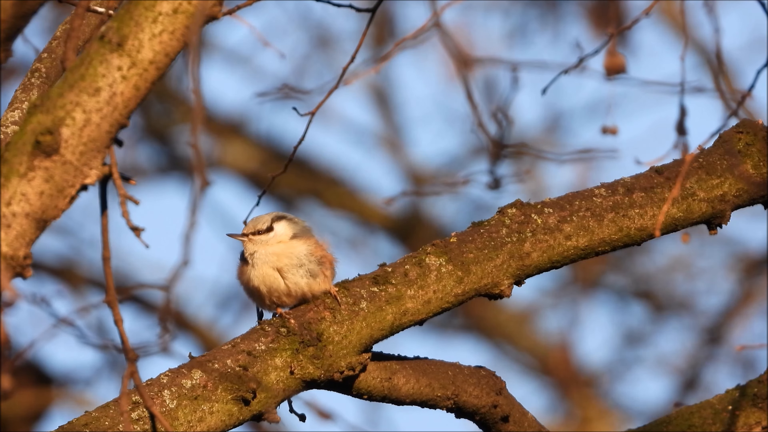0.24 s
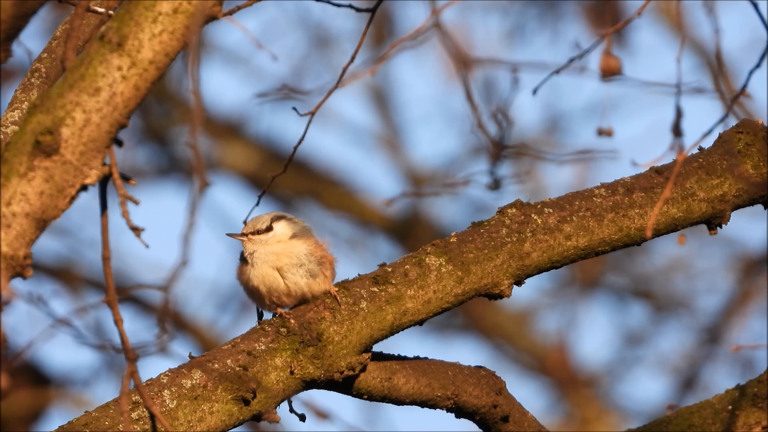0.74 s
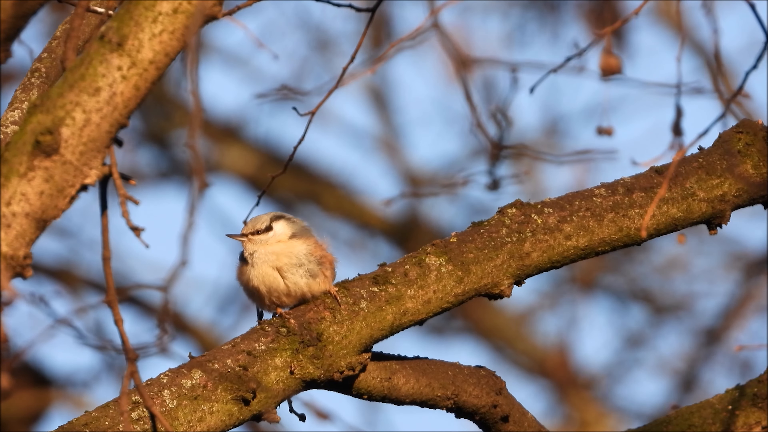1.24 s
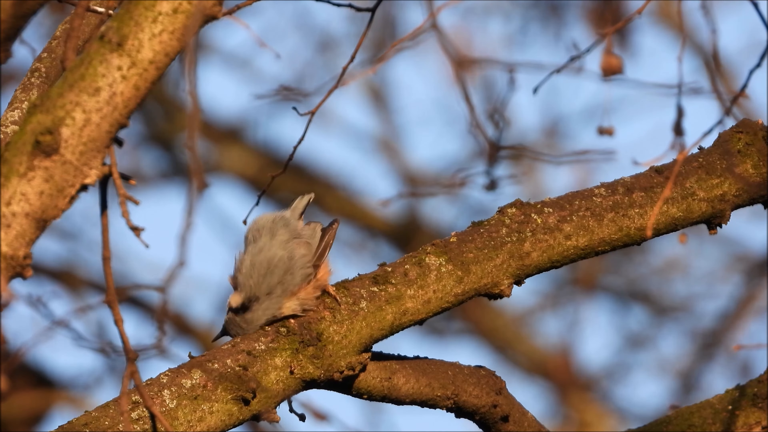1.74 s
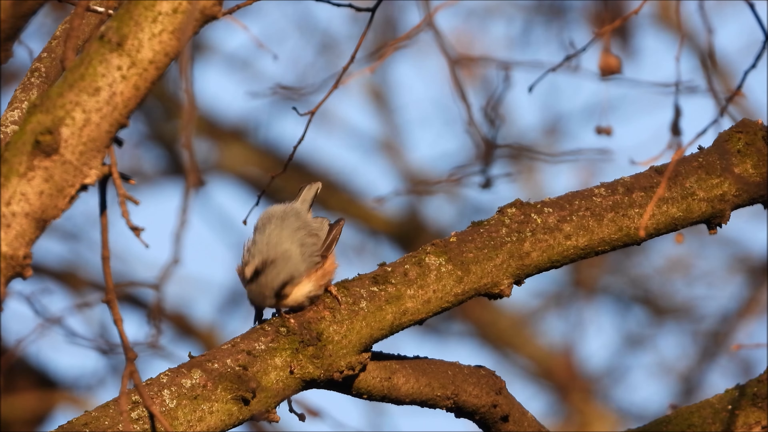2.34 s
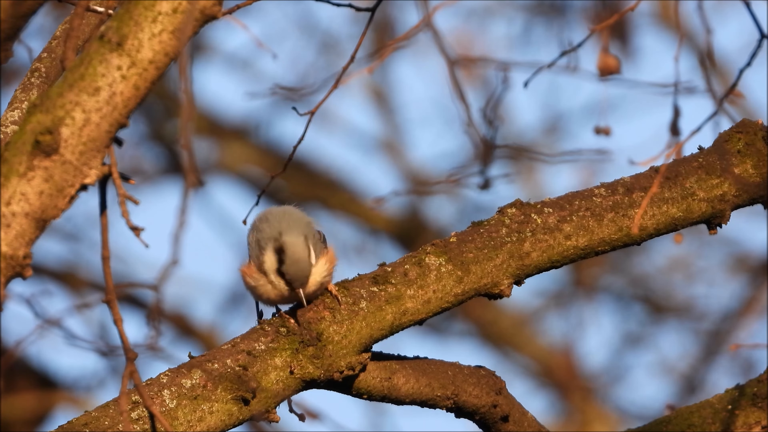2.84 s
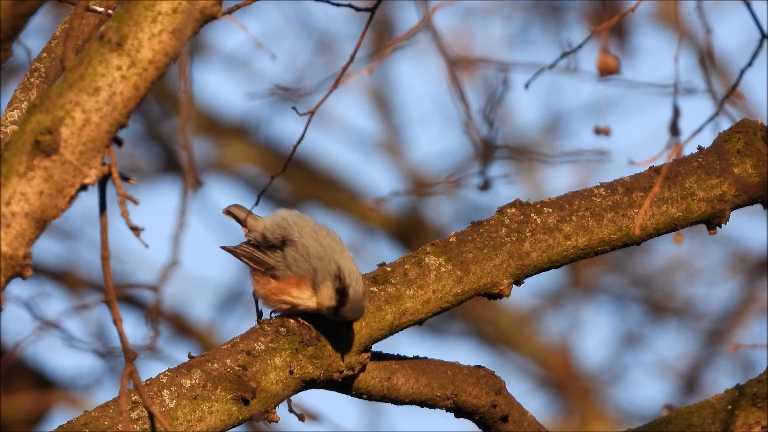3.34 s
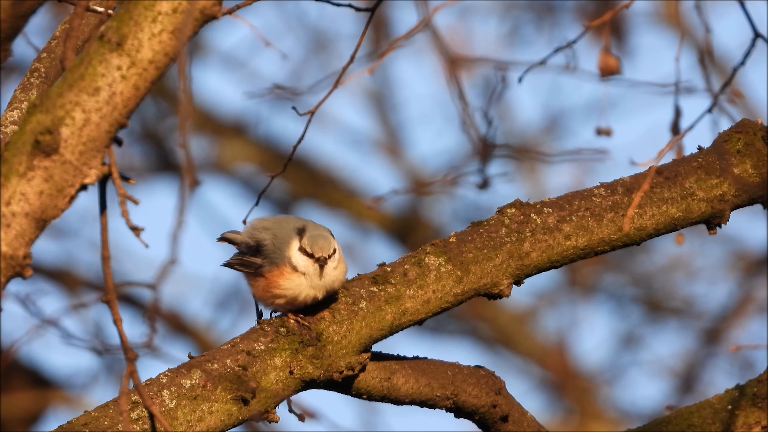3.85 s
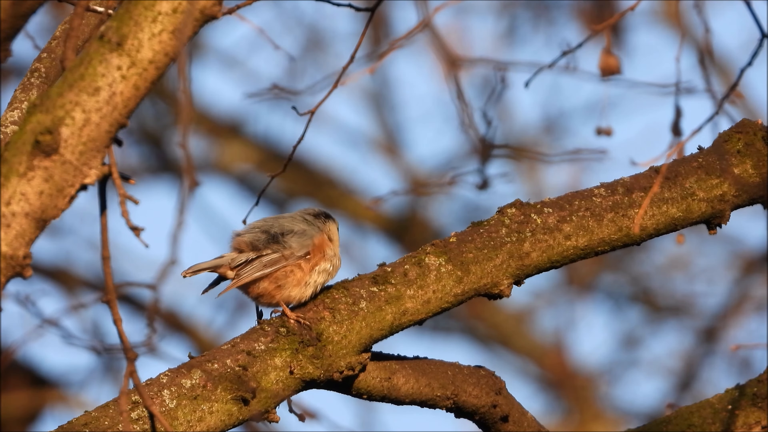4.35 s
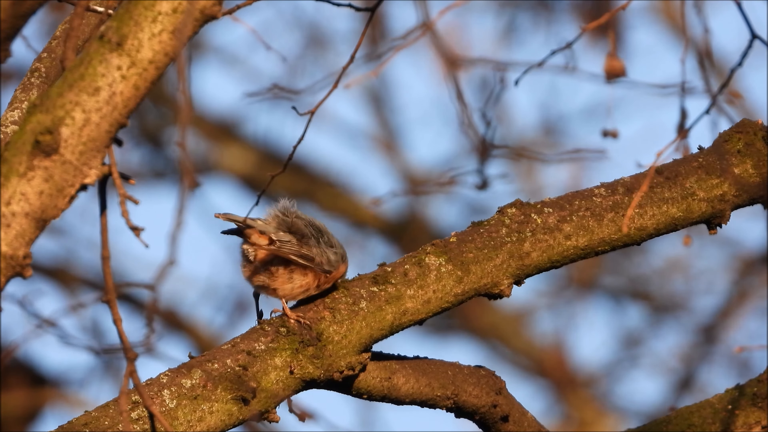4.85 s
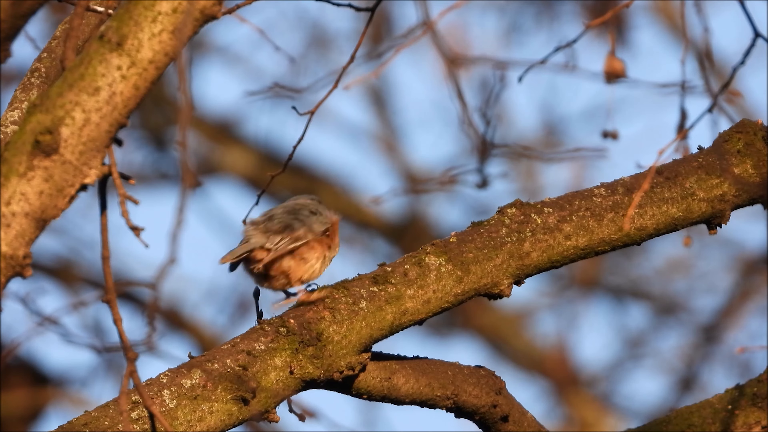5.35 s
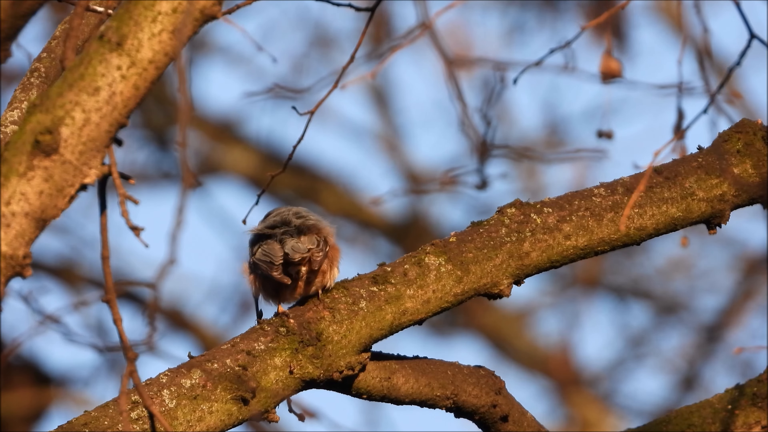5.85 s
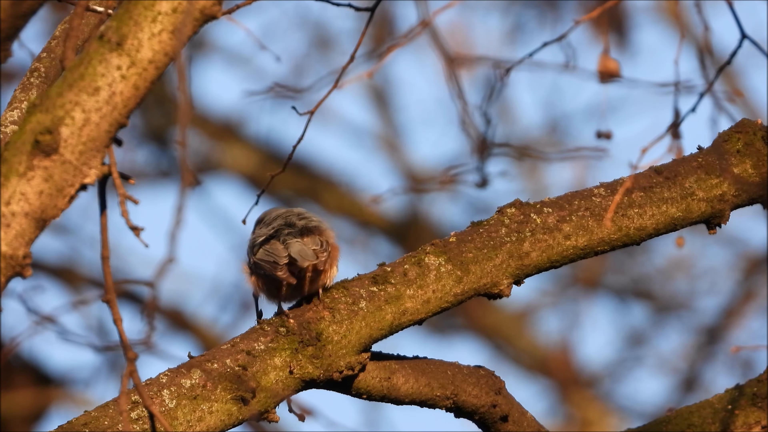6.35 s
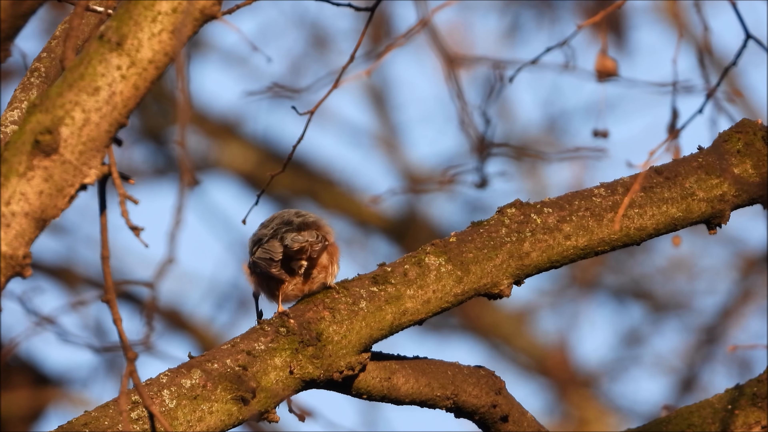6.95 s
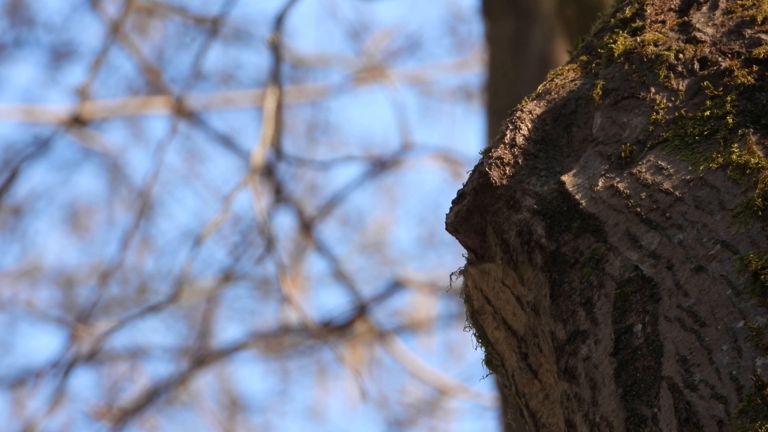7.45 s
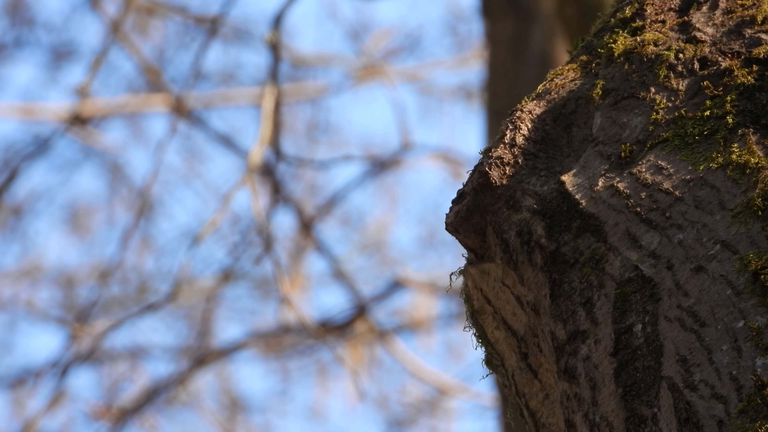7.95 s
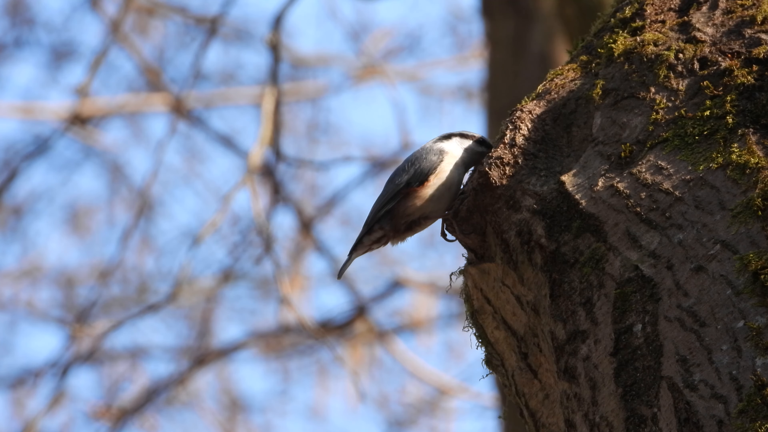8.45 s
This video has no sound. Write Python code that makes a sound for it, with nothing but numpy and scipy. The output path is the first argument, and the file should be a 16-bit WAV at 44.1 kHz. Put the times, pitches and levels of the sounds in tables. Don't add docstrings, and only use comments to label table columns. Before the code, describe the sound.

A quiet winter wood with soft distant traffic hum, very low wind thuds on the microphone, strongest at the start, and a faint aircraft drone fullest near 5.7 s. From 0.3 to 5.3 s a tit repeats one phrase every half second: faint chip, clear level whistle around 4.2 kHz, then a tenth-second buzz dropping to 4.5 kHz with a rapid flutter. A nearer thrush flutes at 1.3 to 2.8 kHz with quick flicks, busy from 0.7 to 2.3 s, again 2.7 to 3.6 s, and 5.6 to 7.1 s. A twig snaps drily at 3.8 s. Thin high twitters appear near 1.9 and 6.2 s. Far thrushes whistle and warble throughout, most clearly from 6 to 8.3 s. The tit restarts, softer and slightly higher, at about 8.5 s. Everything rings in a grainy woodland echo lasting about a second.

```python
import sys
import numpy as np
from scipy import signal
from scipy.fft import rfft, irfft
from scipy.io import wavfile
from scipy.ndimage import uniform_filter1d

SR = 44100
rng = np.random.default_rng(int(sys.argv[2]) if len(sys.argv) > 2 else 0)


def to_linear_factor(level_db):
    exponent = np.asarray(level_db, float) / 20
    return 10 ** exponent


def to_wav(sig):
    pcm = np.clip(np.atleast_2d(sig), -1, 1) * 32767
    pcm = np.round(pcm).astype(np.int16)
    wavfile.write(sys.argv[1], SR, pcm.T)


N = 384111
LEAD = SR // 2

# f/Hz, density/dB
HUM_SPECTRUM = [(30, -11.5), (52, -9), (80, -28.5), (110, -25), (150, -35), (350, -30.5), (730, -35),
                (1250, -46), (2000, -50), (3300, -51), (6000, -58.5), (11700, -60.5), (12200, -81)]
# middle t/s, half length/s, level/dB
GUSTS = [(-.01, 0.034, -18), (0.231, 0.053, -27), (0.537, 0.11, -36.5), (1.287, 0.17, -41.5),
         (1.74, 0.054, -44), (2.3, 0.17, -37.5), (3.317, 0.4, -43), (4.18, 0.11, -37.5), (4.627, 0.13, -43),
         (5.657, 0.18, -27), (6.34, 0.1, -45), (7.036, 0.24, -39), (8.238, 0.32, -44)]

# share of length/1, share of glide/1, level/dB
SCOOP = [(0, 0, -6), (.24, .68, -.5), (.5, .93, -2), (.85, .99, -1), (1, 1, -5)]
SLIDE = [(0, 0.024, -5.5), (0.401, 0.47, 0.5), (1, 0.95, -0.5)]
PLUNGE = [(0, 0, -12), (.2, .0, -6), (.5, .07, -6), (.73, .28, .0), (.88, .65, -4), (1, 1, -6)]
HOLD = [(0, 0.046, 5), (.4, .45, -3.5), (1, 0.99, -1)]
STROKE = [(0, 0, -3.5), (.55, .55, 2), (1, 0.99, -5)]
LEVEL = [(0, 0.1, -2), (0.752, .1, 0.5), (1, 0.95, -2)]
FADE = [(0, 0, -2), (.3, 0, 0.5), (1, 0, -6)]

# t/s, length/s, from f/Hz, to f/Hz, level/dB
FAR_SCOOPS = [
    (4.575, 0.04, 1642, 2250, -66),
    (6.4, 0.089, 2324, 2783, -47),
    (6.53, 0.058, 2600, 3144, -51),
    (6.84, 0.13, 2780, 3310, -54),
    (6.975, 0.082, 2353, 2813, -53),
    (7.77, 0.044, 2520, 3250, -48),
]
FAR_SLIDES = [
    (-.2, 0.11, 3126, 2793, -66.5),
    (4.6, 0.047, 1420, 1263, -60),
    (4.745, 0.038, 2320, 1894, -66),
    (6.6, 0.17, 3235, 2486, -49),
    (7.825, 0.072, 3305, 2840, -54.5),
    (7.9, 0.096, 2760, 2563, -51),
    (8.2, 0.13, 2950, 3394, -58.5),
]
FAR_HOLDS = [(-.15, 0.079, 2540, 2365, -69), (4.592, 0.073, 2607, 2535, -64),
             (4.8, 0.055, 1574, 1486, -66.5), (5.04, 0.16, 2430, 2405, -67.5),
             (5.31, 0.11, 2020, 2000, -63), (5.365, 0.028, 2600, 2550, -60.5),
             (5.385, 0.039, 1380, 1310, -64), (.675, 0.017, 2900, 2955, -55),
             (4.918, 0.019, 2190, 2290, -64.5), (5.355, 0.011, 2270, 2390, -53.5),
             (5.45, 0.13, 1590, 1550, -70), (1.43, .12, 2903, 2860, -54), (3.45, 0.1, 2810, 2580, -54.5)]
FAR_STROKES = [(-.25, .13, 1682, 2130, -63.5), (6.85, 0.014, 3300, 3940, -53),
               (7.745, 0.035, 3000, 3820, -59), (4.45, 0.1, 2340, 2307, -80.5),
               (4.765, 0.01, 3300, 3140, -58), (4.912, 0.014, 1850, 2240, -71),
               (4.926, 0.01, 3150, 2500, -58), (5.0, 0.035, 2810, 3020, -64),
               (5.033, 0.02, 2990, 2470, -65.5), (5.22, 0.096, 1794, 2010, -71),
               (5.36, 0.011, 2300, 3040, -61.5), (5.577, 0.062, 2976, 2904, -66),
               (6.38, 0.04, 2760, 3500, -53.5), (6.495, 0.032, 2996, 3900, -48.5),
               (6.98, 0.037, 1264, 1407, -62), (7.62, 0.064, 2930, 3830, -60.5),
               (7.655, 0.033, 2247, 3120, -55), (7.615, 0.041, 1930, 2310, -71)]
# t/s, length/s, centre f/Hz, level/dB, warble depth/Hz
FAR_RASPS = [(.7, 0.17, 2713, -61, 598), (.9, 0.13, 3400, -59, 455), (.98, 0.23, 2655, -66, 702),
             (1.615, 0.25, 2803, -58.5, 687), (1.47, 0.15, 2347, -56, 301), (2.95, 0.24, 2000, -56, 248.5),
             (3.5, 0.11, 2517, -57, 140), (6.12, 0.039, 2710, -70, 250), (1.0, 0.25, 2150, -56.5, 300),
             (3.09, 0.077, 1455, -67.5, 182), (4.59, 0.085, 2324, -71.5, 404),
             (4.76, 0.036, 2455, -64, 656), (5.01, 0.17, 2780, -68.5, 244), (5.37, 0.11, 2420, -64, 400),
             (5.99, 0.1, 1930, -50, 238), (6.55, 0.22, 3115, -63.5, 403), (6.87, 0.28, 2930, -57, 460),
             (7.69, 0.25, 3050, -62.5, 450), (8.125, 0.18, 2953, -60.5, 500), (6.87, 0.21, 3480, -70, 231)]

# t/s, length/s, from f/Hz, to f/Hz, level/dB
CROWN_STROKES = [(1.4, 0.13, 7800, 7700, -101), (1.982, 0.0084, 6450, 5060, -70.5),
                 (6.142, 0.018, 7050, 6550, -82), (1.93, .03, 8800, 7900, -88),
                 (.08, 0.12, 6900, 6850, -98), (3.61, 0.035, 8400, 7270, -90), (5.47, 0.4, 7680, 7570, -99),
                 (5.99, 0.06, 7050, 5570, -90.5), (6.0, 0.029, 5206, 3730, -92),
                 (6.157, 0.0066, 6500, 4600, -77.5), (6.262, 0.028, 6030, 5470, -63),
                 (6.288, .022, 5370, 3580, -68.5), (6.79, 0.026, 7640, 7070, -100),
                 (8.12, 0.0026, 6600, 3000, -82), (8.19, 0.019, 5000, 4000, -81)]
CROWN_HOLDS = [
    (1.928, 0.085, 7700, 7000, -87),
    (6.29, 0.26, 7730, 7500, -88),
    (8.44, 0.079, 4310, 4350, -72),
]
# t/s, length/s, centre f/Hz, level/dB, warble depth/Hz
CROWN_TRILLS = [
    (6.29, 0.15, 5520, -74.5, 220),
    (6.5, 1.25, 5380, -86, 150),
    (1.925, 0.071, 7100, -71.5, 510),
    (6.165, 0.05, 5200, -80, 500),
    (6.17, .06, 6600, -83, 500),
    (1.985, .06, 5700, -81, 500),
    (6.28, 0.11, 7960, -88, 350),
    (8.13, 0.11, 3900, -80, 450),
    (6.32, 0.22, 4400, -77, 570),
]

# t/s, chip level/dB, whistle level/dB, buzz level/dB
TIT_PHRASES = [(0.333, -78, -55, -48.5), (.829, -69, -46.5, -41.5), (1.311, -54.5, -42, -43.5),
               (1.784, -60, -41, -43.5), (2.288, -62.5, -40, -43), (2.778, -61, -41, -43.5),
               (3.253, -60, -43.5, -43.5), (3.741, -55.5, -43, -45), (4.254, -60.5, -49, -43.5),
               (4.754, -54, -44.5, -43.5), (5.246, -52, -46.5, -46.5), (8.541, -93, -68.5, -53)]
# t/s, pitch factor/1, length factor/1
TIT_SAG = [
    (.33, 1.01, 1.02),
    (.83, 1.007, .965),
    (2.3, .998, .975),
    (4.5, .997, 1.005),
    (5.3, .996, .995),
    (8.5, 1.028, .92),
]
# t from buzz onset/s, f/Hz, level/dB
TIT_CHIP = [(-.231, 3570, -2), (-.219, 3610, -.1), (-.207, 3760, -13)]
TIT_WHISTLE = [(-.19, 4060, -17), (-.178, 4135, -9), (-.162, 4205, -1.5), (-.15, 4214, -.1),
               (-.114, 4215, -2.5)]
# t from onset/s, f/Hz, level/dB, flutter depth/Hz
TIT_BUZZ = [(-.003, 5950, -18, 150), (.002, 5400, -10, 220), (.008, 4780, -4, 240), (.025, 4620, -3, 265),
            (.07, 4490, -.5, 280), (.09, 4460, -1.5, 285), (.104, 4450, -8, 285)]

# t/s, length/s, from f/Hz, to f/Hz, level/dB
NEAR_SCOOPS = [
    (.85, 0.039, 1480, 1802, -47),
    (.893, .065, 1793, 1956, -48),
    (1.174, 0.066, 2223, 2365, -41.5),
    (1.785, 0.08, 1690, 1834, -44.5),
    (2.135, 0.11, 1900, 2272, -44),
    (3.06, 0.046, 1257, 1455, -48),
    (5.69, 0.18, 1320, 1965, -48),
    (6.685, 0.057, 1702, 1830, -46.5),
]
NEAR_LEVELS = [(6.785, 0.021, 1760, 2000, -46.5), (6.825, .05, 1850, 1740, -44.5),
               (1.312, 0.12, 2850, 2800, -51.5), (2.848, .056, 1980, 1900, -42),
               (3.205, .06, 2230, 2150, -45), (1.308, .03, 2340, 2100, -53.5),
               (7.057, 0.084, 2185, 2110, -45), (6.33, 0.087, 2810, 2760, -53),
               (6.055, 0.021, 2200, 2700, -52), (1.155, 0.02, 2120, 1600, -46),
               (6.735, .02, 2400, 1960, -56.5)]
NEAR_SLIDES = [(.774, 0.04, 2290, 1750, -48.5), (.99, 0.016, 2530, 2000, -49),
               (1.07, 0.061, 2435, 1775, -49), (1.875, 0.072, 1769, 1674, -43),
               (2.04, 0.097, 1613, 1292, -46), (2.27, 0.18, 2292, 1642, -47),
               (2.738, 0.04, 2630, 2230, -55), (2.79, 0.049, 2183, 2046, -44.5),
               (1.72, 0.08, 1290, 1700, -48), (6.622, 0.076, 1290, 1720, -47),
               (5.99, 0.042, 1930, 1496, -53)]
NEAR_PLUNGES = [
    (3.39, 0.18, 2810, 1363, -50.5),
    (5.607, .04, 2236, 1460, -48),
    (6.232, 0.16, 2824, 1355, -48),
]
NEAR_HOLDS = [
    (.862, 0.04, 2540, 2710, -49.5),
    (.974, 0.016, 2570, 2710, -44),
    (1.13, 0.056, 1701, 1742, -53.5),
    (3.115, .06, 1310, 1414, -46),
    (6.054, .016, 1723, 1760, -47),
    (6.105, 0.031, 2300, 2352, -44.5),
    (6.195, 0.041, 2276, 2406, -51),
]
NEAR_STROKES = [
    (3.197, 0.011, 2545, 2213, -45),
    (6.065, 0.0458, 2000, 2335, -47.5),
    (8.672, 0.039, 2195, 2455, -58.5),
]
# t/s, length/s, from f/Hz, to f/Hz, level/dB
NEAR_FLICKS = [(.664, 0.0088, 2390, 3050, -66.5), (.688, 0.011, 2800, 1660, -69.5),
               (.718, 0.015, 2320, 3850, -55), (.757, 0.021, 3790, 2460, -55),
               (.905, .022, 2790, 4080, -53), (.963, .016, 3770, 2570, -53),
               (2.905, 0.028, 1875, 1610, -53), (3.178, 0.02, 1495, 2460, -52.5),
               (.728, .012, 1610, 2310, -65.5), (.758, .01, 1800, 2410, -65),
               (5.573, .008, 3930, 2600, -73.5), (1.42, 0.054, 2800, 1441, -51),
               (4.757, .012, 3300, 2100, -66), (4.925, .01, 3100, 2400, -67)]


def curve(rows, column=1):
    columns = np.transpose(rows)
    return np.interp(np.arange(N) / SR, columns[0], columns[column])


def unit(x):
    return x / np.sqrt(np.mean(x ** 2))


def walk(rate_hz, count=N):
    hold = int(SR / rate_hz)
    steps = np.repeat(rng.standard_normal(count // hold + 1), hold)
    return 1.3 * uniform_filter1d(uniform_filter1d(steps, hold), hold)[:count]


def band(lo_hz, hi_hz, count=N):
    sos = signal.butter(2, [lo_hz, hi_hz], "band", fs=SR, output="sos")
    return unit(signal.sosfilt(sos, rng.standard_normal(count)))


def air():
    t = np.arange(N) / SR

    hz, db = np.transpose(HUM_SPECTRUM)
    f = np.arange(N // 2 + 1) * SR / N
    shape = to_linear_factor(np.interp(np.log(f + 1), np.log(hz), db, left=-90))
    hum = unit(irfft(shape * rfft(rng.standard_normal(N)), N))
    hum *= to_linear_factor(-63 + 0.22 * walk(0.89))

    pass_s, near_s, engine_beam = 5.7, 3.4, 2.9
    nearness = 1 / np.hypot(1, (t - pass_s) / near_s)
    engine = to_linear_factor(-75 + 0.85 * walk(1.9)) * nearness ** engine_beam * band(428., 440.)
    puff_db, puff_t60_s = -56.5, 0.033
    roar = (to_linear_factor(-73) * nearness + to_linear_factor(puff_db - 60 * t / puff_t60_s)) * band(190., 700.)

    calm_db, buffet_db = -44.5, 6.5
    wind = to_linear_factor(calm_db) + sum(to_linear_factor(db) * np.exp(-((t - s) / half_s) ** 2) for s, half_s, db in GUSTS)
    push = signal.sosfilt(signal.butter(4, 22., fs=SR, output="sos"), band(12.07, 19.38))
    buffet = to_linear_factor(buffet_db) * wind ** 2 * band(20.4, 30.)
    return hum + engine + roar + wind * unit(push) + buffet


def glides(*groups, voiced=True):
    chest_hz, chest_db_per_khz = 1772, 33
    head_hz, head_db_per_khz = 3050, 13.5
    notes = []
    for rows, shape in groups:
        when, glide, swell_db = np.transpose(shape)
        for s, length_s, start_hz, end_hz, db in rows:
            hz = start_hz + (end_hz - start_hz) * glide
            weak = chest_db_per_khz * np.maximum(chest_hz - hz, 0)
            weak = weak + head_db_per_khz * np.maximum(hz - head_hz, 0)
            level_db = db + swell_db - voiced * weak / 1000
            notes.append(np.transpose([s + length_s * when, hz, level_db]))
    return notes


def warbles(rows):
    return [[(s + length_s * when, hz, db + swell_db, depth_hz) for when, _, swell_db in FADE]
            for s, length_s, hz, db, depth_hz in rows]


def sing(notes, edge_s=.006, warble_hz=0., wobble=0.0037, waver_db=2.5, octave_db=-58):
    out = np.zeros(N + 2 * LEAD)
    for note in notes:
        s, hz, db, *depth_hz = np.transpose(note)
        t = np.arange(s[0] - edge_s, s[-1] + edge_s, 1 / SR)
        count = len(t)

        pitch_hz = uniform_filter1d(np.interp(t, s, hz), size=200, mode="nearest")
        pitch_hz *= 1 + wobble * walk(90, count)
        turn = 2 * np.pi * warble_hz * np.cumsum(1 + .04 * walk(39.5, count)) / SR
        turn += rng.uniform(0, 2 * np.pi)
        if depth_hz:
            pitch_hz += np.interp(t, s, depth_hz[0]) * np.sin(turn)
        phase = 2 * np.pi * np.cumsum(pitch_hz) / SR
        tone = np.sin(phase) + to_linear_factor(octave_db) * np.sin(2 * phase)

        edge = np.clip(np.minimum(t - t[0], t[-1] - t) / (2 * edge_s), 0, 1)
        strength = to_linear_factor(np.interp(t, s, db) + waver_db * walk(65.9, count))
        strength *= np.sin(np.pi / 2 * edge) ** 2
        start = LEAD + int(t[0] * SR)
        out[start:start + count] += np.sqrt(2) * strength * tone
    return out


def wood(x, direct_db, near_db, tail_db, near_t60_s=0.22, tail_t60_s=1.426, lump_db=2.0, damp=0.17,
         shimmer_db=2.0, ground_db=-60, build_s=.03, sway=1.06):
    t = np.arange(2 * SR) / SR
    count = len(t)
    echo = to_linear_factor(near_db - 60 * t / near_t60_s) / np.sqrt(near_t60_s) * rng.standard_normal(count)
    build = 1 - np.exp(-t / build_s)
    for hz in 1000 * 2 ** np.arange(0, 3.6, .5):
        t60_s = tail_t60_s * (hz / 3000) ** -damp
        decay = to_linear_factor(tail_db - 60 * t / t60_s) * np.sqrt(hz / 60000)
        echo += decay * band(hz / 1.15, hz * 1.172, count) * build
    echo *= np.sqrt(2 * np.log(1000) / SR) * to_linear_factor(lump_db * walk(60, count)) * np.clip(t / 0.005, 0, 1)

    share = 2 * walk(80.16, count)
    stretch_s = .00007 * sway
    wet = 0
    for group in (np.cos(share), np.sin(share)):
        stir = walk(45)
        paths = signal.fftconvolve(x, echo * group)[LEAD:LEAD + N] * to_linear_factor(shimmer_db * stir)
        wet = wet + np.interp(np.arange(N) + stretch_s * SR * stir[::-1], np.arange(N), paths)

    ground_lag_s = .00467
    x = x + to_linear_factor(ground_db) * np.roll(x, int(ground_lag_s * SR))
    return to_linear_factor(direct_db) * x[LEAD:LEAD + N] + wet


def far_thrushes():
    syllables = glides((FAR_SCOOPS, SCOOP), (FAR_SLIDES, SLIDE), (FAR_HOLDS, HOLD), (FAR_STROKES, STROKE))
    song = sing(syllables, wobble=0.014, waver_db=2.5)
    song += sing(warbles(FAR_RASPS), edge_s=.015, warble_hz=70.76, wobble=.05, waver_db=2.5)
    return wood(song, -2.5, -5, -1.1, build_s=0.015, sway=1.74, near_t60_s=0.18, tail_t60_s=1.11, damp=0.12)


def crowns():
    thin = glides((CROWN_STROKES, STROKE), (CROWN_HOLDS, HOLD), voiced=False)
    calls = sing(thin, edge_s=0.0032, wobble=0.0066, waver_db=-7.0)
    calls += sing(warbles(CROWN_TRILLS), warble_hz=95.6, wobble=0.013, waver_db=3.0)
    return wood(calls, -3.5, -1.9, -1.3, near_t60_s=0.17, tail_t60_s=0.93)


def tit():
    at = (np.transpose(TIT_PHRASES)[0] * SR).astype(int)
    pitches, paces = curve(TIT_SAG, column=1)[at], curve(TIT_SAG, column=2)[at]

    def placed(shape, column):
        return [[(row[0] + s * pace, hz * pitch, db + row[column], *depth_hz) for s, hz, db, *depth_hz in shape]
                for row, pitch, pace in zip(TIT_PHRASES, pitches, paces)]

    clear = placed(TIT_CHIP, column=1) + placed(TIT_WHISTLE, column=2)
    clear = sing(clear, edge_s=.005, wobble=0.0018, waver_db=1.8)
    buzz = sing(placed(TIT_BUZZ, column=3), edge_s=.0025, warble_hz=213.6, wobble=0.009, waver_db=2.5)
    clear = wood(clear, 0.24, -29.5, -8.0, near_t60_s=0.11, tail_t60_s=1.18, damp=.6, lump_db=0.5,
                 shimmer_db=2, build_s=0.02)
    buzz = wood(buzz, -2.3, -5.5, -2.0, near_t60_s=0.13, tail_t60_s=1.005, damp=0.93, lump_db=1.04,
                shimmer_db=1.0, build_s=0.02)
    return clear + buzz


def near_thrush():
    syllables = glides((NEAR_SCOOPS, SCOOP), (NEAR_SLIDES, SLIDE), (NEAR_PLUNGES, PLUNGE),
                       (NEAR_HOLDS, HOLD), (NEAR_STROKES, STROKE), (NEAR_LEVELS, LEVEL))
    song = sing(syllables, edge_s=.007, wobble=0.011, waver_db=4)
    song += sing(glides((NEAR_FLICKS, STROKE), voiced=False), edge_s=.003, wobble=0.011, waver_db=3.5)
    return wood(song, -1.2, -7.5, -8, build_s=.02, sway=2.23, ground_db=-5.5, near_t60_s=0.09,
                tail_t60_s=0.98, damp=0.087)


def twig():
    snap_s, snap_db, snap_t60_s = 3.793, -57, 0.11
    age_s = np.arange(N) / SR - snap_s
    crack = band(5000., 9000.) + to_linear_factor(-11) * band(1200., 4000.)
    crack += to_linear_factor(-1.0) * band(8000., 10300.) + to_linear_factor(-14) * band(10300., 12500.)
    crack += to_linear_factor(-30.5) * (band(13600., 14400.) + band(15000., 15800.))
    return to_linear_factor(snap_db - 60 * np.abs(age_s) / snap_t60_s) * (age_s > 0) * crack


def scene():
    return (air() + far_thrushes() + crowns() + tit() + near_thrush() + twig())[None]


def band_limit(x):
    return signal.sosfilt(signal.butter(12, 15800, fs=SR, output="sos"), x)


def record(dry):
    return band_limit(dry)


dry = scene()
out = record(dry)
to_wav(out)
```